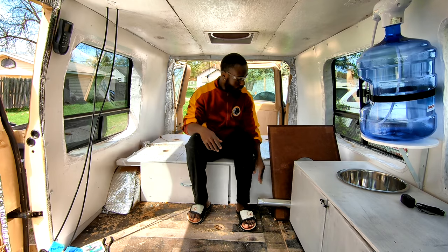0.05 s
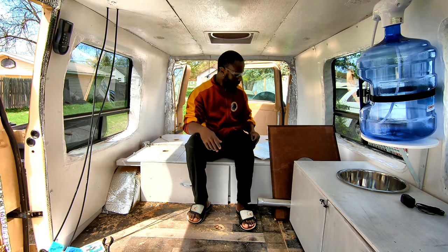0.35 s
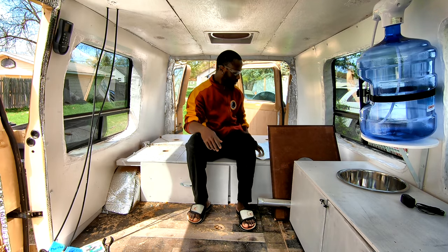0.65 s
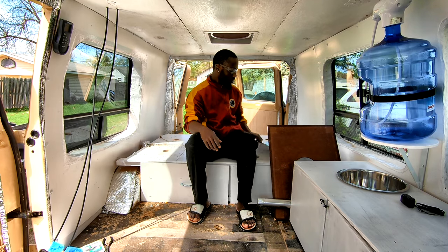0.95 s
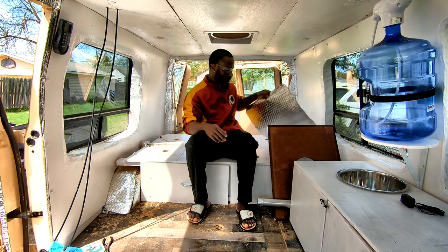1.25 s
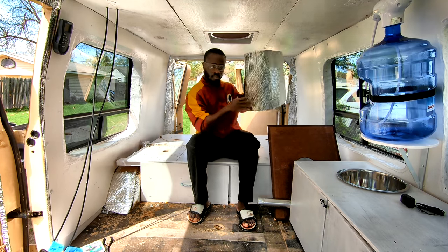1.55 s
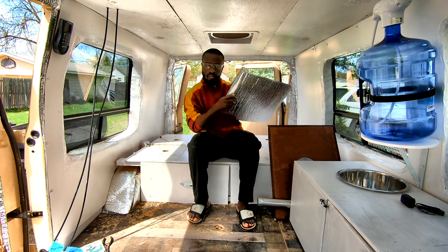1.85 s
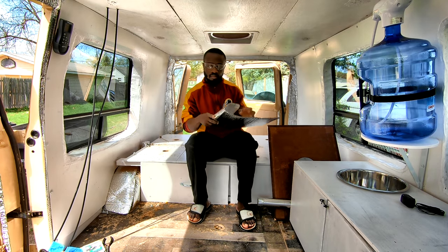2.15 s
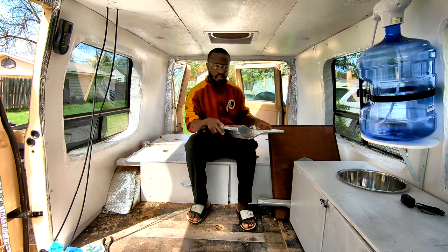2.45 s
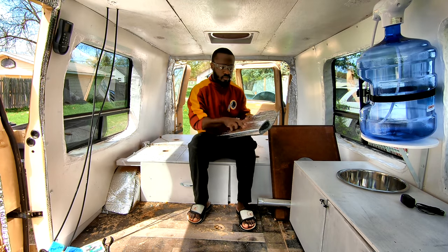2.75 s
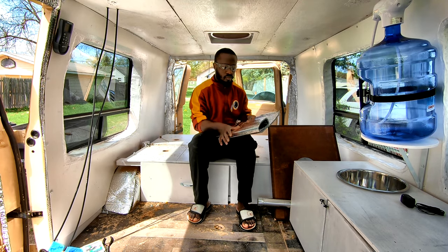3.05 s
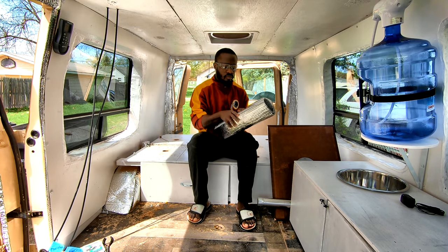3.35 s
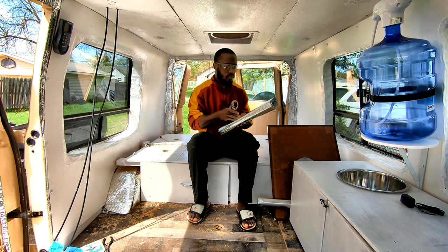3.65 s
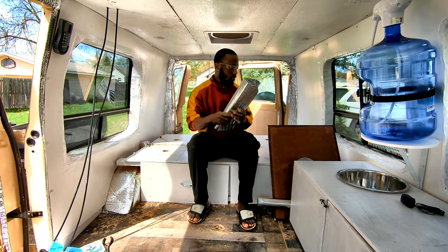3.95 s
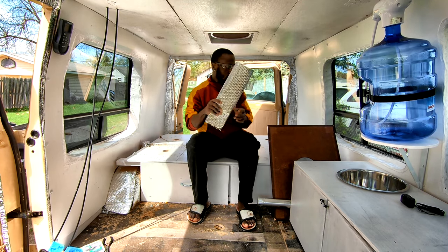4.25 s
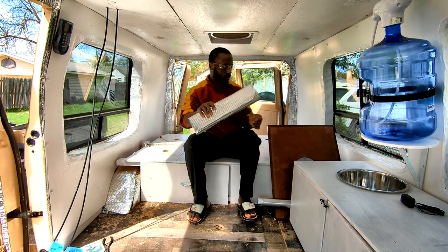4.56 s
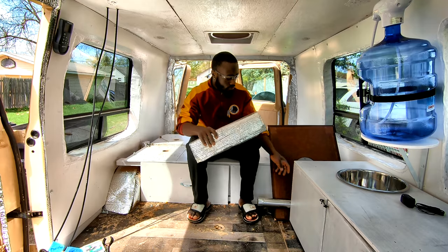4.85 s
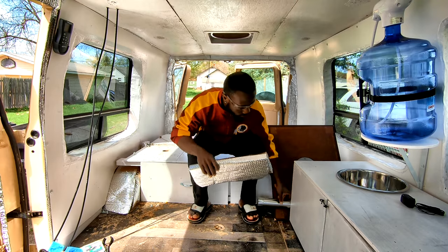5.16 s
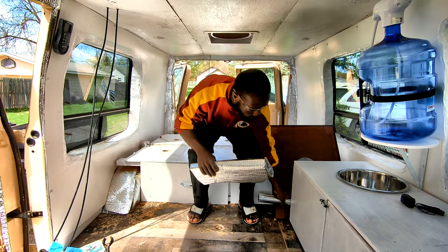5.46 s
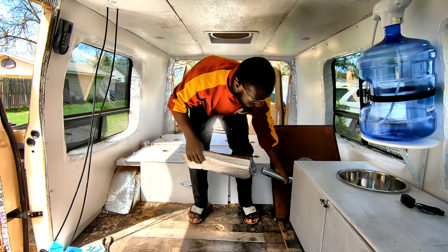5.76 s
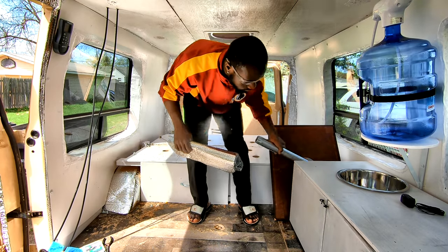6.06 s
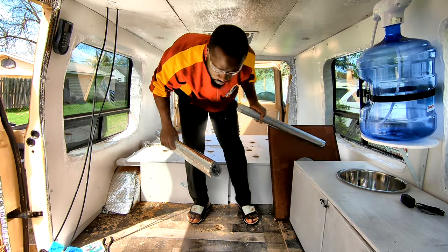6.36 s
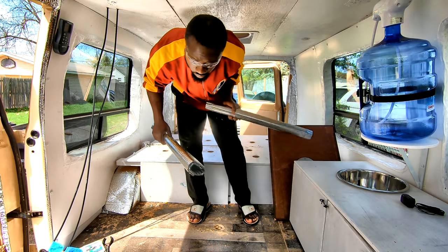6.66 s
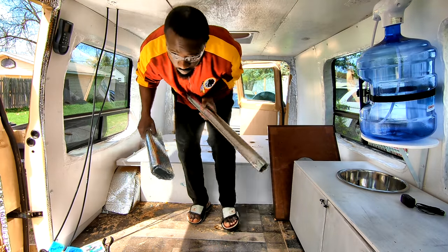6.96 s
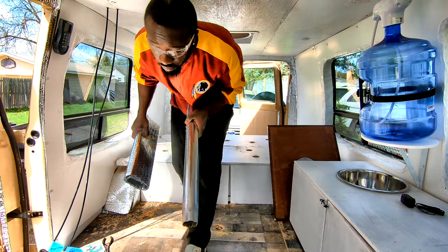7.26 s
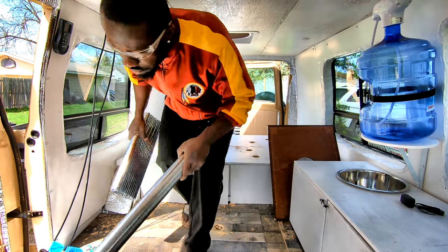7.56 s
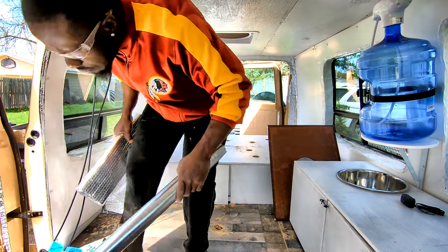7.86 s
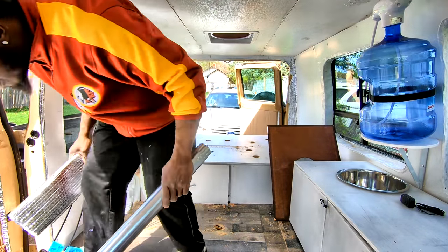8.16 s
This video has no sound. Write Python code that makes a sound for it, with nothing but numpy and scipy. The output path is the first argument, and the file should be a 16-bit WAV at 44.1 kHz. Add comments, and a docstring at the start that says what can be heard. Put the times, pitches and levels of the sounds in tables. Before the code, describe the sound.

Inside a bare van with its doors open, a roll of foil insulation is picked up with a dull bump and turned over, crinkling steadily with sharp little snaps. A little past halfway, a knock comes and a metal tube is dragged out, juddering and ringing briefly. The foil then crackles again close to the microphone, with a few low footsteps and bumps. Traffic rumbles underneath and birds whistle faintly outside.

```python
"""Traffic drones through a bare camper van's open doors; birds whistle far outside and an engine swells.
A roll of foil insulation is picked up, bumping the furniture, and turned over: its skin crackles in
countless tiny buckles and single creases snap. The engine fades, a step rocks the floor, and a metal
tube is dragged out, juddering and ringing. Last, the roll is carried off close past the microphone,
with more steps and bumps, as the engine swells again."""
import sys
import numpy as np
from scipy import signal
from scipy.io import wavfile
from scipy.ndimage import uniform_filter1d

SR = 44100
rng = np.random.default_rng(int(sys.argv[2]) if len(sys.argv) > 2 else 0)


def generate_wav(signal):
    """Clip the signal to [-1, 1] and save it as 16-bit WAV at the path in sys.argv[1]."""
    frames = np.transpose(np.atleast_2d(signal))
    scaled = np.clip(frames, -1, 1) * 32767
    pcm = np.round(scaled).astype(np.int16)
    wavfile.write(sys.argv[1], SR, pcm)


N = 366030
TIME = np.arange(N) / SR
EDGES = 20 * 2 ** (np.arange(25) / 2.5)  # filter bank, 0.4 octave a band [Hz]
CENTRES = np.sqrt(EDGES[1:] * EDGES[:-1])
BANDS = [signal.butter(2, band, "band", fs=SR, output="sos") for band in zip(EDGES, EDGES[1:])]
CABIN_T60_S, DIRECT_DB = 0.13, -4

# Table levels are relative: each layer adds its own gain.
# stereo image of diffuse sound: (frequency [Hz], left-right correlation [-1..1])
STEREO_IMAGE = [(50, 0.98), (100, 0.84), (230, 0.085), (470, 0.0024), (750, -0.6), (1250, -0.72),
                (1750, -0.41), (2400, -0.019), (3500, 0.54), (4300, 0.18), (5200, -0.16), (14000, -0.088)]
# tone colours of street rumble and outdoor air: (frequency [Hz], level [dB])
RUMBLE_COLOUR = [(22, 6), (35, 9.5), (55, 12.5), (75, 4.5), (110, 4.5), (165, -11), (220, -8), (320, -16.5),
                 (600, -20.5), (1200, -24.5), (3000, -64.5)]
AIR_COLOUR = [(100, -15), (400, -2), (900, 5), (1500, -2.5), (2200, -10.5), (3500, -15), (4400, -21),
              (5200, -21), (6500, -19.5), (8000, -32), (11000, -21), (15000, -29.5)]
# fader rides for the rumble, the cabin's low drone, its higher boom, an engine: (time [s], level [dB])
RUMBLE_RIDE = [(0.0, -44), (2.2, -39.5), (3.5, -41.5), (4.6, -39.5), (5.7, -37), (6.5, -41.5), (8.3, -42.5)]
DRONE_RIDE = [(0.0, -60), (0.32, -37), (2.47, -33), (2.63, -54), (3.05, -31.5), (4.07, -38), (4.21, -26),
              (4.53, -36), (5.02, -26), (6.66, -25.5), (6.7, -32.5), (8.3, -36)]
BOOM_RIDE = [(0, -92), (4.3, -58), (5.2, -39), (6.7, -51), (8.0, -38)]
ENGINE_RIDE = [(0.0, -67), (0.35, -34), (1.0, -36.5), (1.4, -28), (2.15, -26.5), (2.5, -39.5), (3.0, -37.5),
               (3.6, -84), (7.5, -72), (8.0, -34.5), (8.3, -28.5)]
# bird notes, mostly downward slurs: (time [s], length [s], start pitch [Hz], fall [octaves], level [dB])
BIRD_NOTES = [(0.0, 0.024, 3630, 0.13, -63.5), (0.169, 0.14, 3360, -0.13, -73.5),
              (0.522, 0.062, 3700, 0.57, -64.5), (4.613, 0.099, 3744, 0.15, -66.5),
              (4.784, 0.058, 6145, 0.089, -64.5), (5.387, 0.058, 3720, 0.057, -72),
              (5.601, 0.12, 4490, 0.44, -72), (5.877, 0.15, 4950, 0.57, -69),
              (6.173, 0.074, 3640, -0.0096, -69.5), (6.326, 0.04, 4710, 0.24, -70),
              (6.4, .045, 3700, 0.29, -71), (6.45, .06, 4450, .15, -74), (6.482, 0.072, 3070, 0.14, -61),
              (6.68, 0.08, 3180, 0.5, -64), (6.905, 0.049, 4280, 0.3, -74), (7.746, 0.075, 4794, 0.5, -70)]
# footfalls: (time [s], level [dB])
FOOTFALLS = [(4.774, -19), (7.325, -16.5), (7.379, -19.5), (8.088, -16.5)]
# pulls of the tube over an edge: (time [s], length [s], judder [dB], ring [dB], slide [dB])
TUBE_DRAGS = [(5.461, 0.12, -42, -48.5, -54), (5.552, 0.11, -51, -69, -63.5), (5.708, 0.042, -35, -56, -76),
              (5.735, 0.068, -26, -39.5, -78), (5.795, 0.039, -25.5, -38, -64)]
# modes of the edge, the tube, a hollow cabinet, its thin panel: (frequency [Hz], level [dB], t60 [s])
EDGE_MODES = [(179, 6, 0.37), (275.5, 5.5, 0.095), (329.4, -1, 0.15), (380, -7, 0.057)]
TUBE_MODES = [(697, 0.5, 0.12), (822, 0.5, 0.093), (936, -1, 0.11), (1040, 0, .05), (1218, -5, 0.1),
              (1365, 0, 0.05), (1570, -13, 0.05), (2090, -13, 0.17), (2440, -10, 0.066), (3320, -17, 0.07),
              (4479, -32, .18)]
CABINET_MODES = [(102, -2, 0.23)]
PANEL_MODES = [(282.5, -7, 0.15), (234, -3, 0.0081), (537, -23.5, 0.094)]
# tone colours of the tube's rasp, its sliding hiss and the foil's crackle: (frequency [Hz], level [dB])
RASP_COLOUR = [(150, 17), (450, -2), (1000, 10), (2000, -2), (4000, -23), (12000, -55)]
HISS_COLOUR = [(500, -16), (1600, 11), (3300, 1.5), (5000, -10), (7200, -14), (12000, -11)]
FOIL_COLOUR = [(200, 10), (300, -3.5), (450, 4.5), (800, 1.5), (1200, 2), (1800, -1), (2500, -1.5),
               (3300, -1.5), (4300, -3.5), (5200, -9), (6400, -1.5), (7800, -9.5), (10000, -7.5),
               (14000, -9.5)]
# hits on the furniture: (time [s], thump [dB], knock [dB], clack [dB])
FURNITURE_HITS = [(0.722, -9.5, -31, -36.5), (0.783, -15.5, -58, -33), (1.7, -14.5, -43, -34.5),
                  (2.451, -26, -20, -68), (4.678, -53, -39.5, -49), (4.793, -46, -35, -46),
                  (5.12, -39, -31, -57), (5.178, -18, -27.5, -37), (5.752, -46, -35, -43),
                  (7.325, -22, -69, -39), (7.966, -30, -65, -53), (8.031, -29, -39, -54)]
# single creases giving way: (time [s], level [dB], crisp treble [dB], fold pitch [Hz])
CREASES = [(0.428, -57, -16, 4250), (0.532, -63, -11, 3300), (0.6388, -42, -22.5, 3100),
           (0.769, -24.5, -32, 2300), (0.839, -31.5, -18, 2580), (0.923, -34.5, -15, 3140),
           (1.1409, -36.5, -16, 3120), (1.299, -31.5, -16, 2150), (1.626, -32.5, -32, 3308),
           (1.702, -24.5, -14, 3360), (1.759, -27.5, -18, 3692), (2.5528, -27, -19, 2200),
           (2.562, -24, -25.5, 2493), (2.9856, -41, 1, 3200), (3.166, -39.5, -12, 3482),
           (3.4609, -28, -18, 2500), (3.697, -37, -8, 2588), (3.744, -26.5, -25, 3885),
           (3.905, -32.5, -23, 1701), (4.2091, -42.5, -5.5, 3503), (4.2606, -36, -19.5, 2888),
           (4.385, -39.5, -18, 1907), (4.5373, -38.5, -14.5, 2104), (4.742, -32, -25, 2140),
           (5.1131, -35, -20, 5710), (5.164, -24.5, -26.5, 1412), (5.224, -35, -23, 4230),
           (5.2737, -41, -19, 2673), (5.3693, -50, -15, 4020), (6.081, -57, -6, 4040),
           (6.243, -53, -18, 3300), (6.353, -73, -3, 11000), (7.19, -37, -35, 3564),
           (7.205, -37, -33, 4020), (7.416, -29.5, -36, 1750), (7.4559, -30, -18, 2810),
           (7.5761, -29.5, -19, 5815), (7.961, -52, -21, 4216), (8.139, -40.5, -18.5, 4190),
           (8.206, -34, -28, 3416)]
# flexes of the roll in the hands, and one long, soft flex as it is turned over:
# (time [s], length [s], level [dB], swell [dB], crisp treble [dB], hollow body [dB], fold pitch [Hz])
HAND_FLEXES = [(0.688, 0.015, -55, 2, -3, 1, 2860), (0.797, 0.15, -48.5, -2.5, -3.5, -10, 2700),
               (1.152, 0.2, -50, 4, -5.5, -11.5, 2344), (1.424, 0.051, -44, -0.5, -4.5, -12, 3500),
               (1.713, .1, -42.5, 0, -2.5, -10.5, 3750), (1.868, .14, -42, 1.5, -4, -7, 3470),
               (2.064, 0.08, -48.5, -2, -5.5, -9.5, 3863), (2.283, 0.18, -47, -4, -5, -8, 3300),
               (2.55, 0.045, -46, 0, -2, -8, 2697), (2.671, 0.17, -42, 1.5, -2.5, -6, 3300),
               (2.919, 0.048, -49, 3, 2.5, -3, 3392), (2.993, 0.026, -41, 1, -2.5, -3, 3235),
               (3.179, 0.24, -47.5, 5, -3, -5, 2740), (3.459, 0.046, -42.5, -1, -5, -6.5, 2600),
               (3.579, 0.16, -46, 7.5, -1.5, -5.5, 2897), (3.926, .035, -52, -6, -1, -0.5, 2503),
               (3.99, .23, -47.5, -5.5, -4, -6, 2867), (4.382, .17, -57.5, -2, -6, -3.5, 3378),
               (4.752, .02, -56, -2, -10, -5, 3300), (4.86, 0.21, -58.5, 8, -2.5, -3.5, 2940),
               (5.08, .11, -50, 3.5, -8, 2, 3170), (5.215, 0.23, -60, -7, -7, -12, 3496),
               (5.958, 0.11, -71, 3, -3, 5, 3600), (6.813, 0.053, -65.5, -3, -9.5, -2.5, 3480),
               (7.2, 0.015, -60.5, 0.5, -4.5, -10, 4030), (7.273, 0.12, -54, 0, -3.5, -6, 4097),
               (7.469, 0.079, -61.5, 1.5, -6, -7, 2816), (7.597, 0.025, -57.5, -2, -3.5, -14, 3998),
               (8.062, 0.044, -57.5, -1, -3.5, -4.5, 3706), (8.213, 0.094, -58, -6.5, -7, -7, 3150)]
TURNING_FLEX = (1.01, 2, -55, 2, -1.5, -6, 3197)


def from_db(db):
    """Decibels to gain."""
    return np.exp(np.asarray(db) * (np.log(10) / 20))


def rms_one(x):
    """Scale to unit power."""
    return x / np.sqrt(np.mean(x ** 2) + 1e-20)


def lowpass(x, hz, order=2):
    """Roll off the top."""
    return signal.sosfilt(signal.butter(order, hz, fs=SR, output="sos"), x)


def automation(rows):
    """One curve for each column after the time, read at every sample."""
    knots, *columns = np.transpose(rows)
    return [np.interp(TIME, knots, column) for column in columns]


def at_hz(points, hz=CENTRES):
    """A spectrum read on a log-frequency axis."""
    knots, values = np.transpose(points)
    return np.interp(np.log(hz), np.log(knots), values)


def drift(per_s):
    """A random wobble at unit power."""
    knots = rng.standard_normal(int(N / SR * per_s) + 2)
    return rms_one(np.interp(TIME * per_s, np.arange(len(knots)), knots))


def clicks(s, heights):
    """Single-sample impulses at the times s."""
    return np.bincount(np.clip(np.round(s * SR).astype(int), 0, N - 1), heights, N) + 1e-18


def ring(force, modes):
    """Each click of force sets every mode ringing as a dying sine."""
    out = 0
    for hz, db, t60 in modes:
        r, w = np.exp(-np.log(1000) / (t60 * SR)), 2 * np.pi * hz / SR
        out = out + signal.lfilter([0, from_db(db) * np.sin(w)], [1, -2 * r * np.cos(w), r * r], force)
    return out


def stereo_noise(gains_db, size=N):
    """Diffuse mid/side noise at unit power, with one gain for each band."""
    out, white = 0, rng.standard_normal((2, 2, size + SR // 4))
    for k, (band, hz, db) in enumerate(zip(BANDS, CENTRES, gains_db)):
        mid, side = signal.sosfilt(band, white[k % 2])[:, -size:]
        alike = at_hz(STEREO_IMAGE, hz)
        out = out + from_db(db) * (np.sqrt(1 + alike) * mid + np.sqrt(1 - alike) * side * [[1], [-1]])
    return rms_one(out)


def reverb(x, direct_db=DIRECT_DB, t60=CABIN_T60_S):
    """The direct sound and, just behind it, a dense dying wash of reflections; power is kept."""
    t = TIME[:SR // 3]
    response = stereo_noise(np.zeros(len(BANDS)), len(t)) * np.exp(-np.log(1000) * t / t60) * (t > .002)
    response /= np.sqrt(np.sum(response ** 2) / 2)
    lag = rng.integers(0, 13, 2)
    response[[0, 1], lag] += from_db(direct_db)
    return signal.fftconvolve(x[None], response, axes=1)[:, :N] / np.sqrt(1 + from_db(direct_db) ** 2)


def hum(ride, hz, wander_hz, gain_db, lead_rad=0.31):
    """A low tone of unsteady pitch that reaches the left microphone a little earlier."""
    phase = 2 * np.pi * np.cumsum(hz + wander_hz * drift(25)) / SR
    return from_db(automation(ride)[0] + gain_db) * np.sqrt(2) * np.sin([phase + lead_rad, phase])


def cabin_boom(hz=166, width_hz=22, gain_db=-3):
    """Street noise rings in a higher, damped air mode of the cabin."""
    mode = signal.butter(2, [hz - width_hz / 2, hz + width_hz / 2], "band", fs=SR, output="sos")
    boom = rms_one(signal.sosfilt(mode, rng.standard_normal(N)))
    return from_db(automation(BOOM_RIDE)[0] + gain_db) * boom


def street():
    """The bed: rumble and air through the doors, two cabin air modes stirred by traffic, an engine."""
    rumble = from_db(automation(RUMBLE_RIDE)[0] + 6.5) * stereo_noise(at_hz(RUMBLE_COLOUR))
    air = from_db(-58) * stereo_noise(at_hz(AIR_COLOUR))
    cabin = hum(DRONE_RIDE, hz=51.75, wander_hz=2.55, gain_db=-1) + cabin_boom()
    engine = hum(ENGINE_RIDE, hz=87.8, wander_hz=1.3, gain_db=-3)
    return rumble + air + cabin + engine


def birds(gain_db=2.7):
    """Slurred, buzzy whistles, scattered by the yard's echoes."""
    song, buzz = np.zeros(N), 1 + .016 * drift(450)
    for s, length, start_hz, fall, db in BIRD_NOTES:
        on = (TIME >= s) & (TIME < s + length)
        along = (TIME[on] - s) / length
        hz = start_hz * 2 ** (-fall * along) * buzz[on]
        envelope = from_db(db + gain_db) * np.sqrt(2 * np.sin(np.pi * along))
        song[on] += envelope * np.sin(2 * np.pi * np.cumsum(hz) / SR)
    return reverb(song, direct_db=-8, t60=.33)


def steps(floor_hz=35.4, floor_t60_s=0.33):
    """The weight of a foot rocks the van on its springs."""
    s, db = np.transpose(FOOTFALLS)
    sway = ring(clicks(s, from_db(db)), [(floor_hz, 0, floor_t60_s)])
    return lowpass(sway, hz=120)


def tube(slips_per_s=700, fade_s=0.021, rasp_db=-2):
    """Sticking and slipping, the tube shakes the edge under it, rings and rasps, squeals and hisses."""
    def driven(force, push, modes):
        """Modes ringing at about the level of the push."""
        return ring(force * push + 1e-18, modes) / np.std(ring(force[:SR] + 1e-18, modes))

    slips = (rng.random(N) < slips_per_s / SR) * rng.standard_normal(N)
    fine_slips = np.gradient(np.gradient(slips))  # brighter, to reach the upper modes
    envelopes = 0
    for s, length, *levels_db in TUBE_DRAGS:
        gate = np.clip(np.minimum(TIME - s, s + length - TIME) / fade_s, 0, 1)
        envelopes = envelopes + np.outer(from_db(levels_db), gate)
    judder, ringing, sliding = envelopes
    edge = driven(slips, judder, EDGE_MODES)
    metal = driven(slips, ringing, TUBE_MODES)
    squeal = driven(fine_slips, sliding, TUBE_MODES)
    rasp = from_db(rasp_db) * ringing * stereo_noise(at_hz(RASP_COLOUR))
    hiss = sliding * stereo_noise(at_hz(HISS_COLOUR))
    return reverb(edge, direct_db=4.5) + reverb(metal + squeal, direct_db=-1) + rasp + hiss


def bumps(contact_hz=500, clack_t60_s=0.21, panel_wet_db=-7):
    """A soft blow booms in the cabinet, knocks on its panel and clatters briefly."""
    s, thump_db, knock_db, clack_db = np.transpose(FURNITURE_HITS)
    thump = ring(clicks(s, from_db(thump_db)), CABINET_MODES)
    knock = ring(lowpass(clicks(s, from_db(knock_db)), contact_hz), PANEL_MODES)
    decay = np.exp(-np.log(1000) / (clack_t60_s * SR))
    tails = signal.lfilter([1], [1, -decay], clicks(s, from_db(clack_db)))
    clack_colour = at_hz([(80, -20), (200, 3), (450, 0), (1100, -4), (2200, -22), (9000, -45)])
    clack = uniform_filter1d(tails, SR // 100) * stereo_noise(clack_colour)
    return thump + knock + from_db(panel_wet_db) * reverb(knock, direct_db=-35) + clack


def buckles(s, db, crisp_db, body_db, pitch_hz, scatter_db, pitch_db, octaves):
    """Each facet of the foil flips with a click and favours a pitch of its own, scattered at random around the
    fold's pitch."""
    out, facet_hz = np.zeros(N), pitch_hz * 2 ** (octaves * rng.standard_normal(len(s)))
    for band, hz in zip(BANDS, CENTRES):
        if hz > FOIL_COLOUR[0][0]:
            treble = crisp_db * at_hz([(3600, 0.083), (8000, 1)], hz)
            body = body_db * at_hz([(1100, 1.0), (2600, 0.069)], hz)
            peak = pitch_db * np.exp(-4 * np.log2(hz / facet_hz) ** 2)
            level = db + at_hz(FOIL_COLOUR, hz) + treble + body + peak + rng.normal(0, scatter_db, len(s))
            out += signal.sosfilt(band, clicks(s, from_db(level) * rng.choice([-1, 1], len(s))))
    return out


def fold_ring(x, hz, boost_db, q, block=128):
    """The bent sheet boosts a narrow band of its crackle, whose centre moves as the fold changes."""
    band, state = np.zeros(N), np.zeros(2)
    for i in range(0, N, block):
        w = 2 * np.pi * hz[i] / SR
        r = np.exp(-w / (2 * q))
        b, a = np.array([1, 0, -1]) * (1 - r * r) / 2, [1, -2 * r * np.cos(w), r * r]
        band[i:i + block], state = signal.lfilter(b, a, x[i:i + block], zi=state)
    return x + (from_db(boost_db) - 1) * band


def snaps(gain_db=18, crisp_db=22, body_db=-3, run_s=.018, close_from_s=7.0, facets=7):
    """A crease lets go, sets off its neighbours and rings its fold; up close it is drier and shorter."""
    s, db, crisp, hz = np.transpose(CREASES)
    latest = np.maximum(np.searchsorted(s - run_s / 2, TIME) - 1, 0)
    out, follows = 0, np.arange(facets) > 0
    far = (s < close_from_s, run_s, -1, -6, 10)
    close = (s >= close_from_s, run_s / 2, 5, -12, 5)
    for chosen, spread_s, direct_db, trail_db, ring_db in (far, close):
        when = s[chosen, None] + follows * spread_s * rng.random((chosen.sum(), facets))
        level = db[chosen, None] + gain_db + follows * trail_db
        treble, pitch = np.repeat(crisp[chosen] + crisp_db, facets), np.repeat(hz[chosen], facets)
        cascade = buckles(when.ravel(), level.ravel(), treble, body_db, pitch,
                          scatter_db=0.7, pitch_db=2.5, octaves=0.29)
        out = out + reverb(fold_ring(cascade, hz[latest], ring_db, q=26), direct_db)
    return out


def handling(attack_db_per_s=446, release_db_per_s=155):
    """Flexes set in, swell or ease, then relax, blending into level, treble, body [dB] and pitch [Hz]."""
    knots = TIME[::32]
    power, crisp, body, pitch = 1e-10, 0, 0, 1e-10 * TURNING_FLEX[-1]
    for s, length, db, swell_db, crisp_db, body_db, hz in HAND_FLEXES + [TURNING_FLEX]:
        t = knots - s
        hold_db = db + swell_db * (np.clip(t / length, 0, 1) - .5)
        fade_db = attack_db_per_s * np.clip(-t, 0, 1) + release_db_per_s * np.clip(t - length, 0, 1)
        share = from_db(hold_db - fade_db) ** 2
        power += share
        crisp += share * crisp_db
        body += share * body_db
        pitch += share * hz
    curves = [knots, 10 * np.log10(power), crisp / power, body / power, pitch / power]
    return automation(np.transpose(curves))


def crinkle(per_s=800, spread_db=2.5, clump_db=5, gain_db=7, crisp_db=6, body_db=6, folds=4):
    """Harder handling flips more facets; they come in clumps, from several folds whose pitches wander."""
    effort_db, crisp, body, fold_hz = handling()
    effort_db = effort_db + 0.69 * drift(22)  # the level wavers slightly
    rate = per_s * from_db((effort_db + 45) * .5)
    flips = rng.random(N) < rate * from_db(clump_db * drift(70)) / SR
    s = TIME[flips]
    size_db = spread_db * np.minimum(rng.exponential(1, len(s)), 4.5)
    # the work of the hands is shared among the facets that flip at about the same moment
    power = uniform_filter1d(clicks(s, from_db(size_db) ** 2), SR // 22)
    db = gain_db + effort_db[flips] + size_db - 10 * np.log10(power[flips] + 1e-9)
    pops = np.array([s, db, crisp[flips] + crisp_db, body[flips] + body_db, fold_hz[flips]])
    out, fold = 0, rng.integers(0, folds, len(s))
    for k in range(folds):
        crackle = buckles(*pops[:, fold == k], scatter_db=0.5, pitch_db=5.5, octaves=1.25)
        wander_octaves = 0.26 * drift(16)
        out = out + reverb(fold_ring(crackle, fold_hz * 2 ** wander_octaves, boost_db=6.5, q=10.7))
    return out


def scene(furniture_pan_db=1.5):
    """The mix: foil up front, bumps and tube a little to the left, steps, birds and street behind."""
    furniture = (bumps() + tube()) * from_db([[furniture_pan_db], [-furniture_pan_db]])
    return crinkle() + snaps() + furniture + steps() + birds() + street()


def record(dry, top_hz=9940, cutoff_hz=15000):
    """The microphone's top rolls off, then is cut steeply."""
    soft = lowpass(lowpass(dry, top_hz), hz=13500, order=4)
    return signal.sosfilt(signal.ellip(10, .2, 80, cutoff_hz, fs=SR, output="sos"), soft)


dry = scene()
out = record(dry)
generate_wav(out)
```